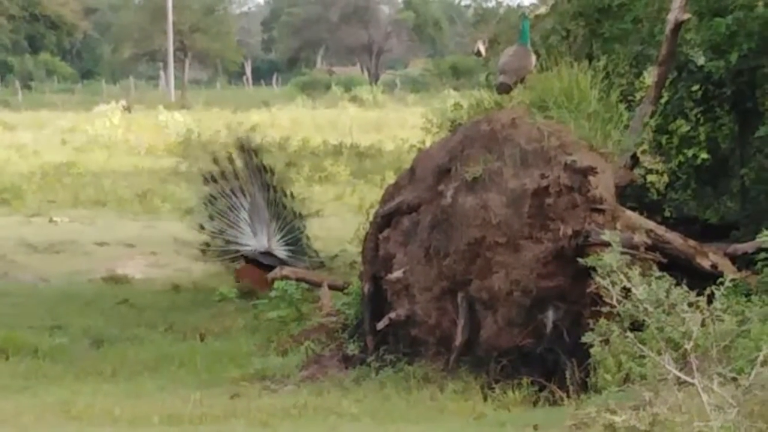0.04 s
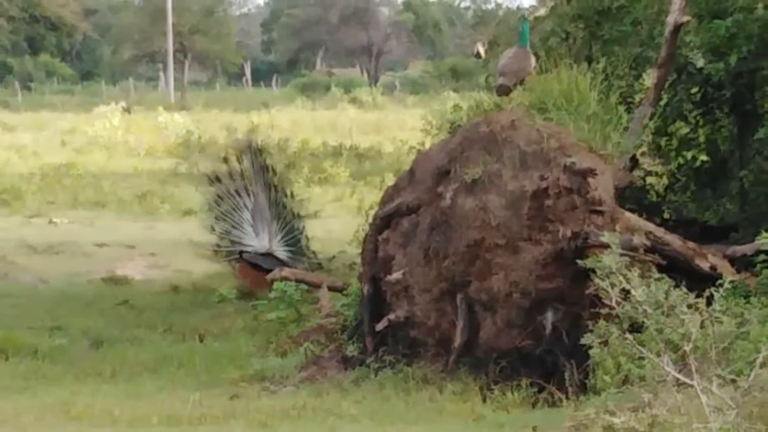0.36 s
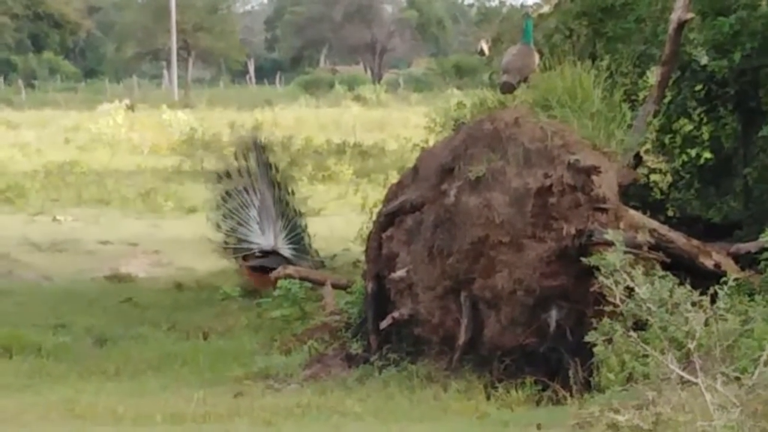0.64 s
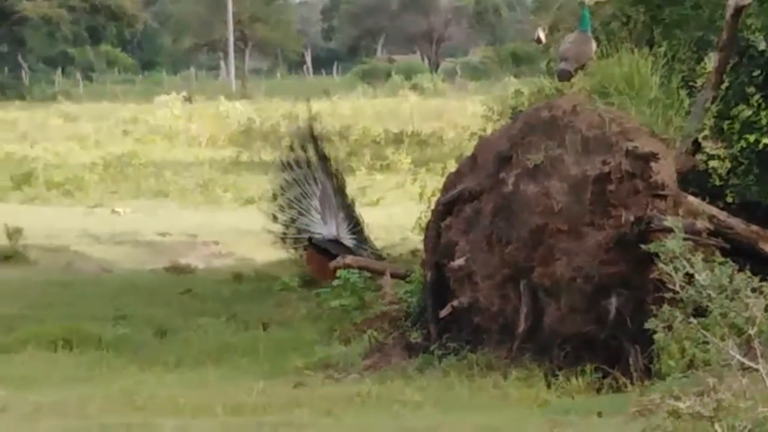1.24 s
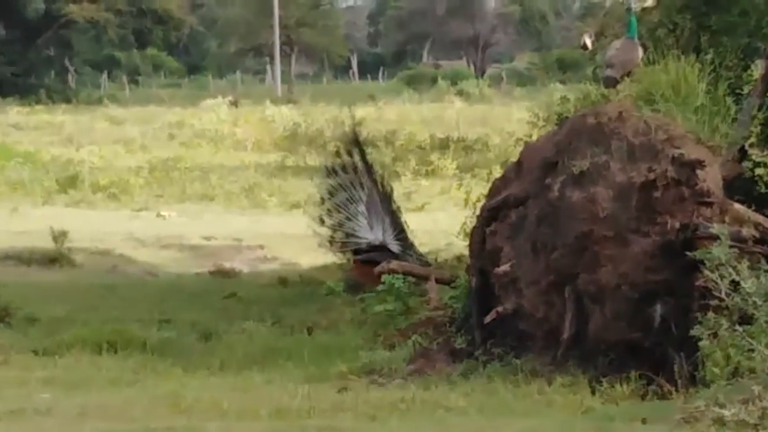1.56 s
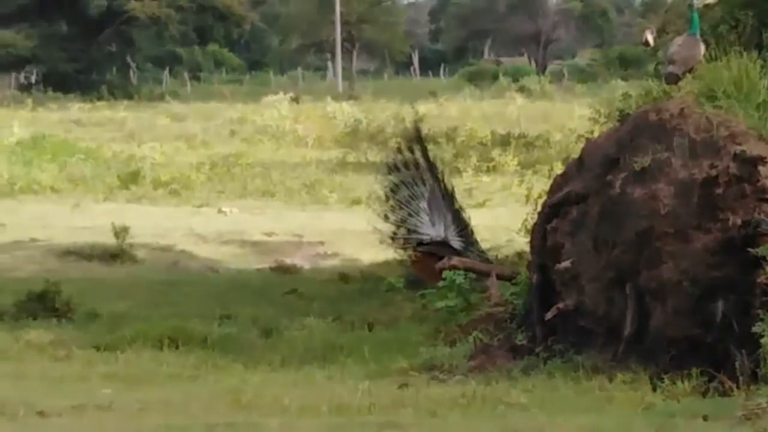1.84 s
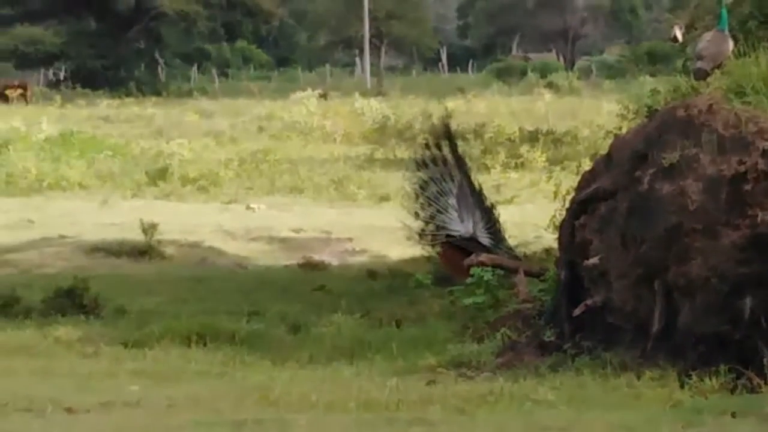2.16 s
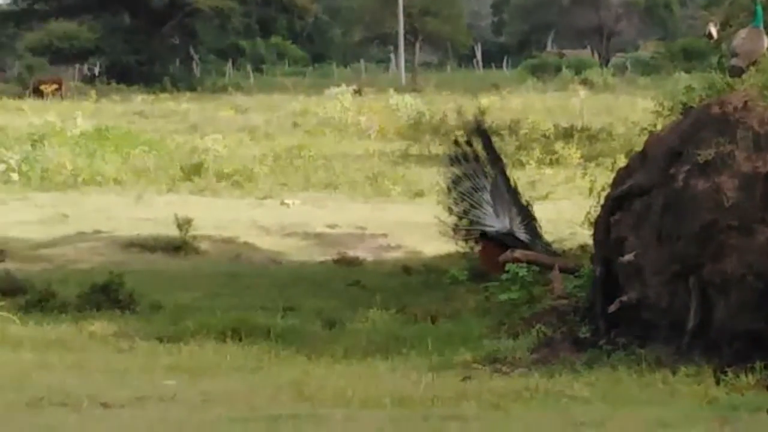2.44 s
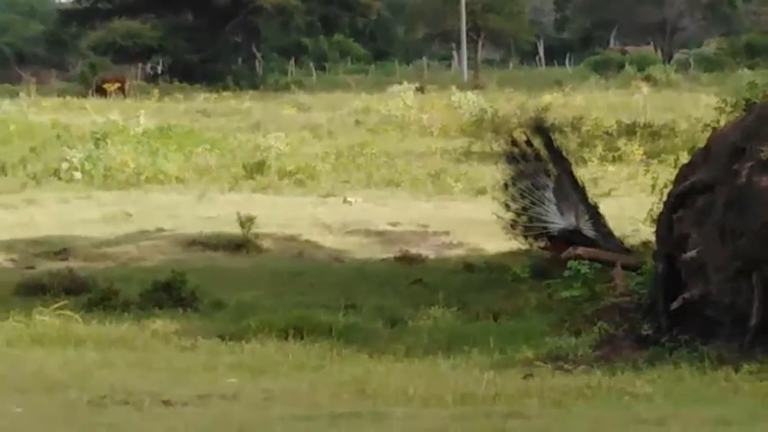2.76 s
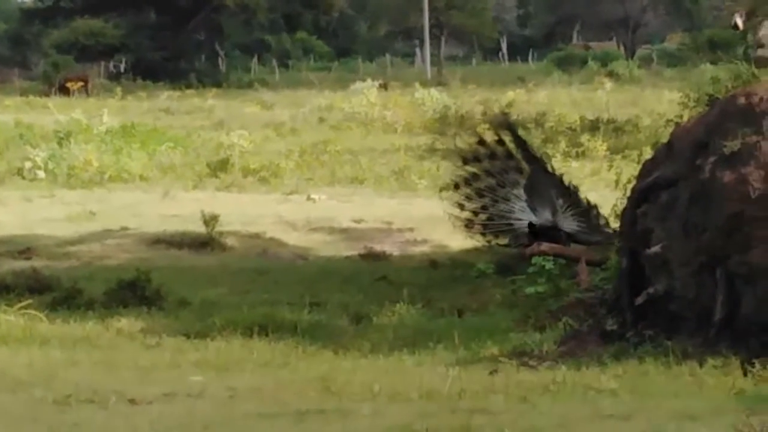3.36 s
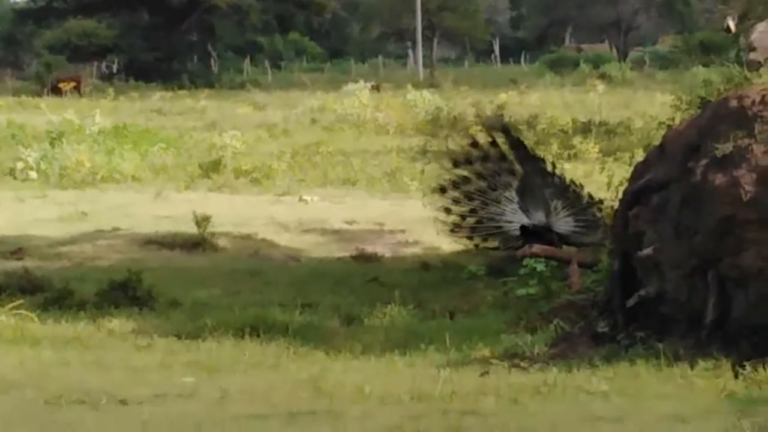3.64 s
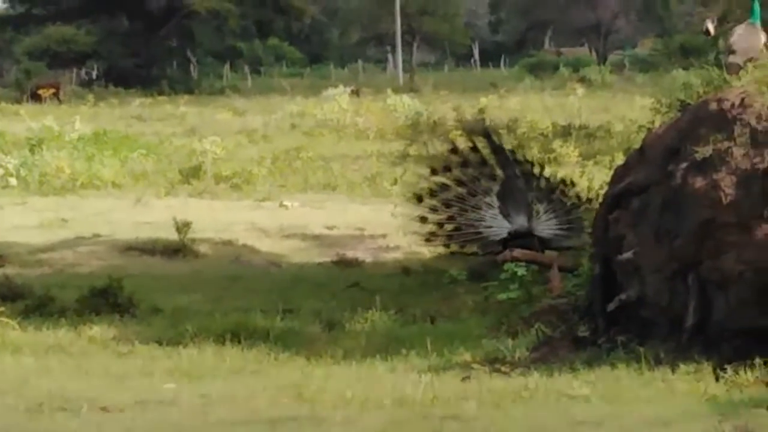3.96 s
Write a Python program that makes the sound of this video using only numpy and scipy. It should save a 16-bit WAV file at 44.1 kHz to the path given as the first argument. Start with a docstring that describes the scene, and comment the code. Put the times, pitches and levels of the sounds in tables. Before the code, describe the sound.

A small single-cylinder vehicle putters close past on grit, leaving an idling engine and birds.

```python
"""Open grassland, beside a gritty track. A small single-cylinder vehicle putters past, close by:
its firings excite the resonances of the exhaust pipe, its casing clatters with a Doppler shift, its
drive whines and loose metal clinks. The tyres hiss with many tiny impacts and crack a few stones.
As it fades, another engine is heard idling nearby, insects shrill in a narrow band, far birds chirp
and one bird gives a single harsh screech, which reverberates off the trees."""
import sys
import numpy as np
from scipy import signal
from scipy.fft import rfft, irfft, next_fast_len
from scipy.io import wavfile
from scipy.ndimage import map_coordinates

SR = 44100
rng = np.random.default_rng(int(sys.argv[2]) if len(sys.argv) > 2 else 0)


def waveform_to_disk(signal):
    """Save audio, clipped to [-1, 1], as 16-bit WAV at the path in sys.argv[1]."""
    frames = np.transpose(np.atleast_2d(signal))
    scaled = np.clip(frames, -1, 1) * 32767
    samples = np.round(scaled).astype(np.int16)
    wavfile.write(sys.argv[1], SR, samples)


N = 176400


def amp(db):
    """Amplitude ratio of a level in decibels."""
    return 10 ** (np.asarray(db) / 20)

def unit(x):
    """Normalisation to rms 1."""
    return x / np.sqrt(np.mean(x ** 2) + 1e-20)

def clock():
    """Time of every sample, t/s."""
    return np.arange(N) / SR

def curve(rows, column=1):
    """Linear interpolation of one column of a time table, per sample."""
    columns = np.transpose(rows)
    return np.interp(clock(), columns[0], columns[column])

def along(points, hz):
    """Interpolation of (f/Hz, value) points on a logarithmic frequency axis."""
    f, values = np.transpose(points)
    return np.interp(np.log(hz + 1), np.log(f + 1), values)

def wobble(rate):
    """Smooth random modulation: a spline through `rate` Gaussian knots a second."""
    knots = rng.standard_normal(int(N * rate / SR) + 4)
    return map_coordinates(knots, [np.arange(N) * rate / SR])

def filtered(x, response):
    """Linear filtering: the spectrum is multiplied by a frequency response."""
    size = next_fast_len(N + SR // 2)
    return irfft(rfft(x, size) * response(np.fft.rfftfreq(size, 1 / SR)), size)[..., :N]

def pan(db):
    """Left and right gains for a level difference, left minus right."""
    return unit(amp(np.array([[db], [-db]]) / 2))

# Correlation of left and right: f/Hz, coefficient
CORRELATION = [(30, 0.84), (130, 0.94), (290, 0.79), (640, 0.45), (1400, -0.098), (12000, -0.027)]
def noise(response, grain=1):
    """Partially coherent stereo noise of rms 1, nearly mono in the bass and wide in the treble."""
    def mid_and_side(hz):
        angle = np.arccos(np.clip(along(CORRELATION, hz), -1, 1)) / 2
        return response(hz) * np.array([np.cos(angle), np.sin(angle)])
    mid, side = filtered(grain * rng.standard_normal((2, N)), mid_and_side)
    return unit(np.array([mid + side, mid - side]))

def shaped_noise(spectrum, grain=1):
    """Spectral shaping of stereo noise by (f/Hz, level/dB) points."""
    return noise(lambda hz: amp(along(spectrum, hz)), grain)


# Firing rate of the passing engine: t/s, f/Hz
FIRING_RATE = [(0, 26.16), (.1, 24.25), (.3, 29.93), (.5, 32.42), (.7, 29.36), (.9, 26.45), (1.25, 25.77),
               (1.7, 21.93)]
def firing_cycles():
    """Phase, counted in firings, is the time integral of the firing rate."""
    return .74 + np.cumsum(curve(FIRING_RATE)) / SR

# Exhaust pulses: t/s, level/dB, pitch ratio of the pipe
EXHAUST_PULSES = [(0, -18.5, 0.86), (.17, -12.5, 0.96), (.5, -10, 1.03), (.75, -8, 0.98), (1.1, -7.3, 0.96),
                  (1.27, -9.5, 1.0), (1.3, -16, 0.8), (1.39, -10.5, 0.68), (1.51, -14, .68),
                  (1.56, -29, .68), (2.5, -42, 0.68)]
# Uneven coughs off the throttle: t/s, level/dB
COUGHS = [(1.585, -19), (1.676, -17.5), (1.928, -19), (1.978, -22), (2.286, -18.5), (2.338, -20.5),
          (2.464, -21)]
# Pipe modes: f/Hz at pitch ratio 1, relative level/dB, T60/s
PIPE_MODES = [(177.6, 6.5, 0.04), (94.6, -10, 0.11), (226, -19.5, 0.039), (402, -16, 0.056)]
def exhaust(cough_pitch=.64, rise_s=.0039, scatter_db=.83, detuning=.012, low_cut_hz=70):
    """Impulse excitation: each firing or cough sets the damped modes of the pipe ringing."""
    out, t = np.zeros(N + SR), np.arange(SR // 8) / SR
    level, pitch = curve(EXHAUST_PULSES), curve(EXHAUST_PULSES, column=2)
    firings = np.flatnonzero(np.diff(np.floor(firing_cycles())))
    pulses = [(start, level[start], pitch[start]) for start in firings]
    pulses += [(round(s * SR), db, cough_pitch) for s, db in COUGHS]
    attack = 1 - np.exp(-(t / rise_s) ** 2)
    for start, pulse_db, ratio in pulses:
        for hz, db, t60 in PIPE_MODES:
            decay = amp(pulse_db + db + scatter_db * rng.normal() - 60 * t / t60)
            mode_hz = hz * ratio * (1 + detuning * rng.normal())
            out[start:start + len(t)] -= attack * decay * np.sin(2 * np.pi * mode_hz * t)
    return filtered(out[:N], lambda hz: 1 - np.exp(-(hz / low_cut_hz) ** 2))

# Growl on the approach: t/s, level/dB
GROWL_LEVEL = [(.1, -64), (.45, -36.5), (.66, -33.5), (.85, -75)]
# Its harmonics: multiple of the firing rate, relative level/dB
GROWL_HARMONICS = [(16, -2), (17, -1)]
def growl():
    """Directivity: high harmonics of the firing rate stand out while the engine faces the listener."""
    cycles = firing_cycles()
    harmonics = sum(amp(db) * np.sin(2 * np.pi * (round(k) * cycles + rng.random()) + wobble(19.6) / 2)
                    for k, db in GROWL_HARMONICS)
    return amp(curve(GROWL_LEVEL)) * harmonics

# Clatter, with one jolt just after the pass: t/s, level/dB
CLATTER_LEVEL = [(0, -47), (.35, -36), (.47, -29.5), (.65, -29.5), (.82, -31), (1.02, -37), (1.05, -28),
                 (1.1, -38.5), (1.5, -46.5), (2.2, -52), (4, -80)]
# Casing resonances at rest: f/Hz, bandwidth/Hz, relative level/dB
CASING_MODES = [(520, 186, -5), (1065, 356, -1), (1600, 530, -4.5), (2180, 280, -5), (3150, 300, -9)]
def clatter(doppler=.09, pass_s=.72, glide_s=.16, pulse_depth=.27):
    """Doppler effect: the resonances of the casing, rattling with the firings, sink as it goes by."""
    def resonances(f):
        return sum((-1) ** k * amp(db) * 1j * f * width / (hz * hz - f * f + 1j * f * width)
                   for k, (hz, width, db) in enumerate(CASING_MODES))
    frequency_ratio = 1 - doppler * np.tanh((clock() - pass_s) / glide_s)
    emitted_at = np.cumsum(frequency_ratio)
    shifted = np.array([map_coordinates(side, [emitted_at], mode="mirror") for side in noise(resonances)])
    pulsing = 1 + pulse_depth * np.cos(2 * np.pi * (firing_cycles() - .3))
    return shifted * amp(curve(CLATTER_LEVEL)) * pulsing

# Whine of the drive: t/s, f/Hz, level/dB
WHINE_GLIDE = [(.4, 1200, -58), (.54, 1167, -39), (.65, 1128, -30), (.8, 996, -35), (.9, 977, -42),
               (1, 952, -38), (1.07, 950, -37), (1.17, 938.7, -90)]
# Its harmonics: multiple, relative level/dB
WHINE_HARMONICS = [(1, 0), (2, -9)]
def whine(width_hz=90):
    """Line broadening: random modulation blurs the drive's whine, which sinks during the pass."""
    phase = 2 * np.pi * np.cumsum(curve(WHINE_GLIDE)) / SR
    bands = sum(amp(db) * (wobble(width_hz) * np.sin(k * phase) + wobble(width_hz) * np.cos(k * phase))
                for k, db in WHINE_HARMONICS)
    return amp(curve(WHINE_GLIDE, column=2)) * bands

# Tyres on grit: t/s, level/dB
TYRE_LEVEL = [(0, -33), (.3, -27.5), (.6, -23.5), (1.06, -24), (1.12, -27.5), (1.33, -30.5), (1.55, -36.5),
              (1.9, -43), (2.35, -49), (2.7, -62), (4, -82)]
# Spectrum of the grit: f/Hz, relative level/dB
GRIT_SPECTRUM = [(60, -16), (400, -2), (1300, -6.5), (2400, -1.5), (3300, -1.5), (4400, 0), (5700, -4),
                 (8200, -6.5), (10700, -2.5), (13000, -4.5), (14300, -12.5)]
def tyres(spikiness_db=1.5):
    """Incoherent superposition: a dense spray of tiny grit impacts merges into a hiss."""
    grains = amp(spikiness_db * wobble(2500) + .88 * wobble(120))
    return shaped_noise(GRIT_SPECTRUM, grains) * amp(curve(TYRE_LEVEL) + 1.1 * wobble(17.78))

# Crunch of the track behind the vehicle: t/s, level/dB
CRUNCH_LEVEL = [(.9, -55), (1.2, -35.5), (1.4, -39.5), (1.9, -48.5), (2.5, -64)]
# Its spectrum: f/Hz, relative level/dB
CRUNCH_SPECTRUM = [(1200, -22), (2000, 3.5), (2600, 2), (4000, -23.5)]
def crunch():
    """Band-limited noise: a dull tyre crunch swells just after the pass, then fades."""
    return shaped_noise(CRUNCH_SPECTRUM) * amp(curve(CRUNCH_LEVEL))

# Stones under the tyres: t/s, level/dB, T60/s
STONE_CRACKS = [(0.739, -8, 0.023), (.907, -16.5, 0.077), (.948, -6.3, 0.04), (1.016, -9.3, 0.051),
                (1.0395, -7.5, 0.053), (1.056, -14, 0.047), (1.665, -30.5, .04), (2.1203, -27, .018)]
# Their spectrum: f/Hz, relative level/dB
STONE_SPECTRUM = [(200, -15), (1000, 1.5), (3300, -4.5), (4200, 6), (5600, -1), (8000, 2), (11000, 4.5),
                  (14000, 3.5)]
def stones(rise_to_decay=.62):
    """Fracture transients: noise grows exponentially as a stone grinds, and decays once it cracks."""
    envelope = np.zeros(N)
    for crack_s, db, t60 in STONE_CRACKS:
        t = clock() - crack_s
        envelope += amp(db - 60 * np.maximum(t, -t / rise_to_decay) / t60)
    return envelope * shaped_noise(STONE_SPECTRUM, grain=amp(2.1 * wobble(1500)))

# Clinks on the vehicle: t/s, level/dB
METAL_STRIKES = [(.736, -15), (1.013, -21), (1.321, -23.5)]
def clinks(hz=4320, t60=.054, rise_s=.0014):
    """Damped free vibration: a loose metal part rings briefly, with an unsteady phase."""
    out = np.zeros(N)
    for strike_s, db in METAL_STRIKES:
        t = np.maximum(clock() - strike_s, 0)
        envelope = amp(db - 60 * t / t60) * (1 - np.exp(-t / rise_s))
        out += envelope * np.sin(2 * np.pi * hz * t + wobble(400))
    return out


# Hum of the idling engine: multiple of the firing rate, rms level/dB
HUM_HARMONICS = [(2, -51), (3, -47), (4, -41), (6, -46.5)]
# Spectrum of its thud: f/Hz, relative level/dB
THUD_SPECTRUM = [(20, -37.5), (45, -27), (80, 1.5), (140, 0), (190, -4.5), (300, -8.5), (450, -17.5),
                 (1000, -30.5), (3000, -80)]
# Spectrum of its tick: f/Hz, relative level/dB
TICK_SPECTRUM = [(100, -7), (350, -0.5), (600, -1.5), (900, -6.5), (1150, -5), (1500, -7.5), (2500, -10.5),
                 (4000, -16.5), (6000, -19), (7500, -54)]
def idling_engine(firing_hz=22.68, thud_db=-36.5, tick_db=-42):
    """Amplitude modulation: alternately strong and weak firings pulse noise over a harmonic hum."""
    cycles = firing_hz * clock() + 1.03
    age = cycles % 1
    pulse = np.exp(-age / .36) * (1 - np.exp(-age / .047))
    pulse /= pulse.max()
    swing_db = 6 - 2.5 * (np.floor(cycles) % 2)  # every second firing is weaker
    hum = np.zeros(N)
    for k, db in HUM_HARMONICS:
        peak = np.sqrt(2) * amp(db + 1.8 * wobble(6.31))
        hum += peak * np.sin(2 * np.pi * (round(k) * cycles + rng.random()) + .42 * wobble(6.02))
    thud = unit(shaped_noise(THUD_SPECTRUM) * amp(pulse * swing_db))
    tick = unit(shaped_noise(TICK_SPECTRUM) * amp(pulse * (swing_db + 1.8 * wobble(20))))
    return hum + amp(thud_db) * thud + amp(tick_db) * pan(2.2) * tick


# The bird's call: t/s, fundamental f/Hz, level/dB
SCREECH_CONTOUR = [(3.677, 3450, -49), (3.685, 3104, -48), (3.688, 2358, -33), (3.7, 2265, -27.5),
                   (3.713, 2330, -31), (3.738, 2400, -30.5), (3.75, 2335, -28), (3.774, 2235, -27),
                   (3.779, 2220, -37), (3.783, 3080, -39), (3.8, 2430, -50)]
# Its harmonics: multiple, relative level/dB, left minus right/dB
SCREECH_HARMONICS = [(1, -11.5, -8), (2, -2.5, 0.5), (3, -12, 2), (4, -10.5, 4), (5, -11.5, -4),
                     (6, -28, -1)]
# Its rasp: t/s, level/dB
RASP_LEVEL = [(3.665, -58), (3.69, -42), (3.73, -51), (3.77, -47), (3.785, -33.5), (3.8, -36.5),
              (3.82, -52)]
# Spectrum of the rasp: f/Hz, relative level/dB
RASP_SPECTRUM = [(2000, -22), (3500, -5), (4500, 0.5), (5500, -4), (7000, -11), (9500, -12), (13000, -23)]
def screech(jitter=.01, flutter_db=2, hoarseness=.22, width_hz=950):
    """Noise sidebands make each higher harmonic hoarser in a bird's call that breaks into a rasp."""
    t = clock()
    gate = lambda rows: (t > rows[0][0]) * (t < rows[-1][0])
    pitch_hz = curve(SCREECH_CONTOUR) * (1 + jitter * wobble(500))
    phase = 2 * np.pi * np.cumsum(pitch_hz) / SR
    envelope = amp(curve(SCREECH_CONTOUR, column=2) + flutter_db * wobble(250)) * gate(SCREECH_CONTOUR)
    rasp = shaped_noise(RASP_SPECTRUM) * amp(curve(RASP_LEVEL)) * gate(RASP_LEVEL)
    voice = np.zeros((2, N))
    for k, db, balance_db in SCREECH_HARMONICS:
        fuzz = np.array([wobble(width_hz) + 1j * wobble(width_hz) for _ in range(2)])
        tone = np.exp(1j * (round(k) * phase + 2 * np.pi * rng.random((2, 1))))
        voice += amp(db) * pan(balance_db) * unit(np.real(tone * (1 + hoarseness * k * fuzz)))
    return envelope * voice + rasp

def among_trees(call, echo_db=-9, t60=.49):
    """Reverberation: reflections off the trees add an exponentially decaying tail to a call."""
    tail = rng.standard_normal((2, SR // 2)) * amp(-60 * clock()[:SR // 2] / t60)
    tail /= np.linalg.norm(tail[0])
    return call + amp(echo_db) * signal.fftconvolve(call, tail, axes=1)[:, :N]

# Spectrum of the insects: f/Hz, relative level/dB
INSECT_SPECTRUM = [(7800, -42), (8800, -8), (9250, 16), (9700, 4), (10100, -26)]
def insects(level_db=-59):
    """Narrow-band noise: a continuous shrill from the grass, flickering slightly in level."""
    return amp(level_db + 1.9 * wobble(60)) * shaped_noise(INSECT_SPECTRUM)

# Notes of small far birds: t/s, duration/s, start f/Hz, end f/Hz, level/dB
BIRD_NOTES = [(2.485, .06, 5300, 6100, -51), (2.94, .07, 2800, 3300, -53)]
def chirps(jitter=.021):
    """Frequency sweeps: each short note rises in pitch under a half-sine envelope."""
    out = np.zeros(N)
    for start_s, duration, from_hz, to_hz, db in BIRD_NOTES:
        progress = np.clip((clock() - start_s) / duration, 0, 1)
        hz = (from_hz + (to_hz - from_hz) * progress) * (1 + jitter * wobble(400))
        out += amp(db) * np.sin(np.pi * progress) * np.sin(2 * np.pi * np.cumsum(hz) / SR)
    return out


def scene():
    """Superposition: the pressures of the passing vehicle, the idling engine and the wildlife add."""
    vehicle = exhaust() + growl() + clatter() + whine() + tyres() + crunch() + stones() + clinks()
    return vehicle + idling_engine() + insects() + among_trees(screech()) + chirps()

# Imbalance of the two microphone ports: f/Hz, left minus right/dB
PORT_BALANCE = [(250, .3), (600, -2), (1500, -1.5), (2400, -2.5), (3300, 0), (4600, 3.3), (6000, 3),
                (7500, -2.5), (9000, -7), (11000, -12.5)]
def record(dry, cutoff_hz=14350):
    """Frequency response: both ports are band-limited, and the left is duller in the high treble."""
    def response(hz):
        gains = amp(np.array([[1], [-1]]) * along(PORT_BALANCE, hz) / 2)
        gains /= np.sqrt(np.mean(gains ** 2, axis=0))
        low_pass = np.clip((cutoff_hz - hz) / 100 + 1 / 2, 0, 1)
        return gains * low_pass
    return filtered(dry, response)


dry = scene()
out = record(dry)
waveform_to_disk(out)
```